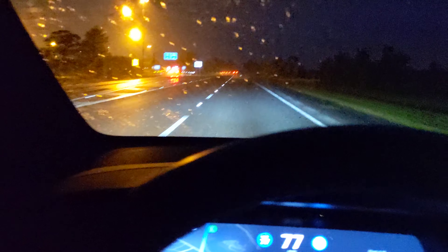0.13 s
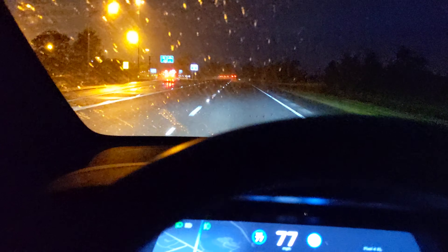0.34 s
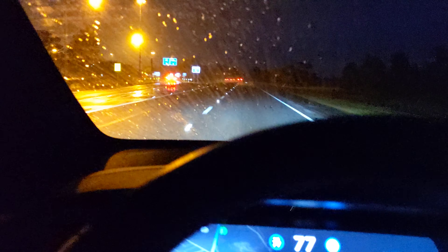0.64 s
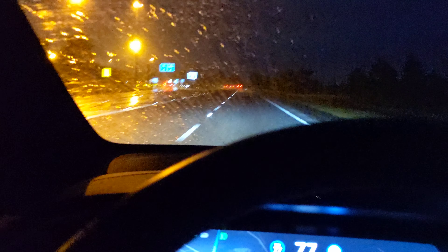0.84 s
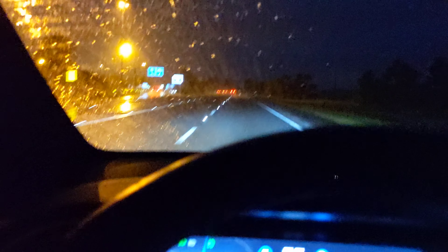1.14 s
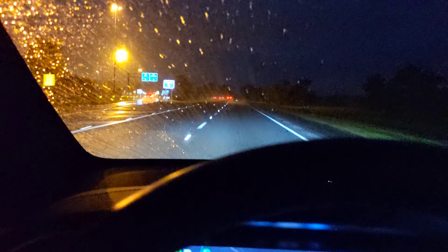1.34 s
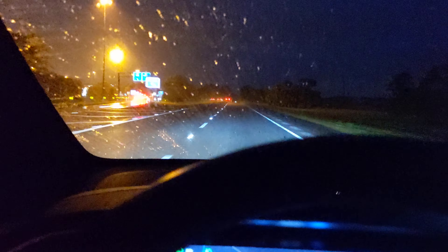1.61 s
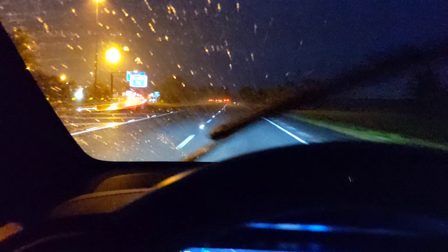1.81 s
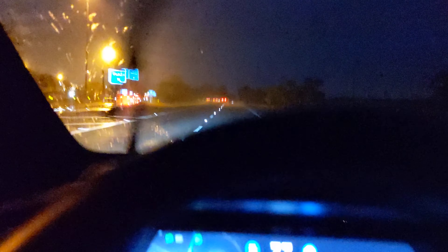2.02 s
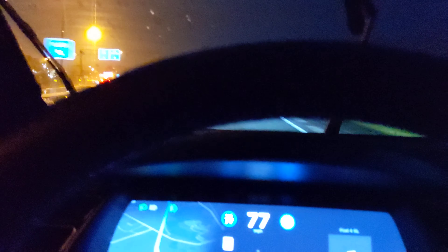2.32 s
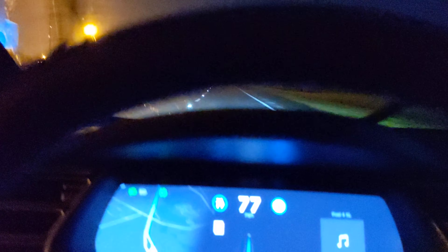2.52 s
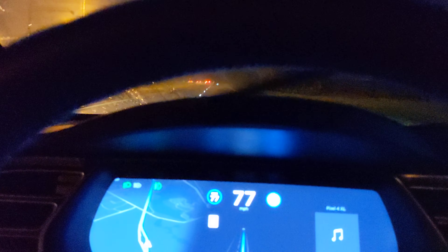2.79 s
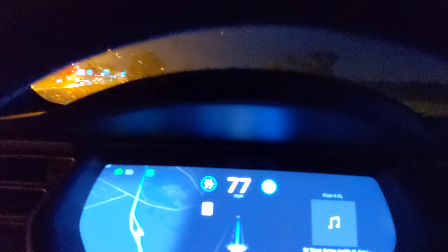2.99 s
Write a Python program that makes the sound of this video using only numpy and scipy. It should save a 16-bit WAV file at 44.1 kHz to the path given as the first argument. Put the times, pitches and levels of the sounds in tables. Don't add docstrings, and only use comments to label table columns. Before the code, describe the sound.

Steady boomy road rumble fills a closed car cabin after a quick fade-in, with quiet fluttering wet hiss and sparse bright drop ticks, more frequent in the last second; close handheld stereo phone microphone.

```python
import sys
import numpy as np
from scipy import signal
from scipy.fft import rfft, irfft, next_fast_len
from scipy.io import wavfile
from scipy.ndimage import uniform_filter1d, map_coordinates

SR = 44100
rng = np.random.default_rng(int(sys.argv[2]) if len(sys.argv) > 2 else 0)


def volts_from_db(level):
    exponent = np.asarray(level, float) / 20
    return 10 ** exponent


def master_out(mix):
    frames = np.transpose(np.atleast_2d(mix))
    ceiling = np.clip(frames, -1, 1)
    pcm = np.round(ceiling * 32767).astype(np.int16)
    wavfile.write(sys.argv[1], SR, pcm)


N = 138915


def unit(x):
    return x / np.sqrt(np.mean(x ** 2) + 1e-20)


def along(points, hz, column=1):
    table = np.transpose(points)
    return np.interp(np.log(hz + 1), np.log(table[0] + 1), table[column])


def curve(rows, t):
    return np.interp(t, *np.transpose(rows))


def wobble(rate):
    knots = rng.standard_normal(int(N * rate / SR) + 4)
    return map_coordinates(knots, [np.arange(N) * rate / SR])


def filtered(x, response):
    m = next_fast_len(N + 8192)
    return irfft(rfft(x, m) * response(np.fft.rfftfreq(m, 1 / SR)), m)[..., :N]


def patchy(patchy_db):
    z = signal.stft(rng.standard_normal((2, N)), nperseg=512)[2]
    field = uniform_filter1d(rng.standard_normal(z.shape[1:]), size=6, axis=0)
    field = uniform_filter1d(field, size=10, axis=1)
    return unit(signal.istft(z * volts_from_db(patchy_db * unit(field)), nperseg=512)[1][:, :N])


def rumble():
    # f/Hz, level/dB per Hz
    body = [(20, -25.5), (45, -1), (110, -10.5), (190, -20.5), (400, -23.5), (480, -32.5), (1400, -35),
            (2000, -51.5)]
    # f/Hz, width/Hz, level/dB per Hz, left over right/dB
    cabin = [(87.4, 15.5, -1.5, 11.5), (128.9, 17.9, -2, 9), (149, 28, -14, 1), (317.7, 14.1, -14.5, 6.5),
             (351, 35, -16, 2.5), (405.5, 46, -16, -1.5), (585.7, 28, -25.5, 6), (676, 65, -25.5, 4),
             (721.5, 70, -21.5, 3), (898, 120, -31, 4), (956, 44, -26.5, 1.5), (1214, 54, -31, 9.5),
             (1329, 86, -36, -6), (1773, 19, -37.5, 1)]
    # f/Hz, left over right/dB
    balance = [(30, 1), (100, -1.5), (180, 0.5), (260, -0.5), (500, -4.5), (2000, 0.5)]
    # f/Hz, likeness/-1 to 1
    alike = [(30, 1), (110, 0.92), (170, 0.62), (250, 0.26), (390, 0.74), (780, 0.88), (1250, 0.18),
             (1700, 0)]
    half = np.array([[.5], [-.5]])

    def mid_and_side(hz):
        angle = np.arccos(np.clip(along(alike, hz), -1, 1)) / 2
        return np.array([np.cos(angle), np.sin(angle)])

    def colour(hz):
        power = volts_from_db(2 * (along(body, hz) + half * along(balance, hz))) * (hz < body[-1][0])
        for centre, width, db, side_db in cabin:
            peak = 1 / (1 + (2 * (hz - centre) / width) ** 2) ** 2
            power = power + volts_from_db(2 * (db + half * side_db)) * peak
        return np.sqrt(power)

    mid, side = filtered(patchy(patchy_db=0.05), mid_and_side)
    level_db = -12.5 + 0.2 * wobble(2.81)
    return volts_from_db(level_db) * unit(filtered(np.array([mid + side, mid - side]), colour))


def drops():
    drops_per_s, centre_hz, decay_cycles, spread_db = 900, 8000, 2.5, 2.5
    count = int(drops_per_s * N / SR)
    u, k = rng.random((count, 4)), np.arange(64)
    hz = np.clip(centre_hz * np.exp(1.39 * (u[:, 1:2] - .5)), 1500, 15000)
    size = volts_from_db(-spread_db * np.log(u[:, 2:3] + 1 / 20))
    decay = np.exp(-k * hz / SR / decay_cycles * 2)
    grains = size * np.sin(2 * np.pi * hz * k / SR) * decay
    room = N + len(k)
    at = (u[:, :1] * N).astype(int) + k + (u[:, 3:] > .5) * room
    return unit(np.bincount(at.ravel(), grains.ravel(), 2 * room).reshape(2, -1)[:, :N])


def spray():
    # f/Hz, level/dB per Hz
    hiss = [(1200, -7), (1700, -3.5), (2500, 0.5), (3500, -7.5), (5000, -11), (8500, -14), (12500, -13),
            (15800, -21.5)]
    # t/s, level/dB
    wetness = [(0.2, 1), (.45, 2), (.7, 0), (.95, 3), (1.3, 0.5), (1.7, 1.5), (2.0, 2), (2.3, 1),
               (2.6, -0.5), (2.9, -0.5), (3.15, 1)]
    # t/s, peak level over the spray/dB, length/s
    splashes = [(0.478, 2, .02), (0.581, 3.5, 0.016), (0.597, 5, 0.063), (0.887, 3, 0.032),
                (.98, 2.5, 0.022), (1.105, 3.5, 0.014), (1.15, 2, 0.033), (1.357, 4, .02), (1.506, 2, .04),
                (1.66, 2.5, .02), (1.68, 2.5, 0.03), (1.711, 3.5, 0.029), (1.792, -3, .01),
                (1.949, 3, 0.031), (1.983, 2, .04), (2.055, 3.5, 0.016), (2.082, -1.5, .02),
                (2.173, 3, 0.016), (2.231, 3.5, 0.034), (2.283, 4.5, .025), (2.351, 4, 0.018),
                (2.385, 4.5, 0.023), (2.42, 4, 0.0085), (2.478, 3, .015), (2.525, 4.5, 0.058),
                (2.629, 4, 0.036), (2.768, -0.5, 0.017), (2.786, 3, 0.039), (2.92, 4, 0.012),
                (2.969, 1, .012), (3.014, 3.5, .012)]
    rise_s, split_hz, dull_swing, bright_swing = 0.001, 3800, 0.59, 1.14
    t = np.arange(N) / SR
    swell_db = 0.29 * wobble(25.11) + 0.81 * wobble(70)
    for s, db, length in splashes:
        rise = (t - s) / rise_s + 1
        fall = 2 - 2 * (t - s) / (1.14 * length)
        swell_db = swell_db + db * np.clip(np.minimum(rise, fall), 0, 1)
    water = patchy(patchy_db=1.16) + volts_from_db(-11) * drops()
    water = filtered(water, lambda hz: volts_from_db(along(hiss, hz)) * (hz > 900))
    dull = filtered(water, lambda hz: 1 / (1 + (hz / split_hz) ** 4))
    swung = volts_from_db(dull_swing * swell_db) * dull + volts_from_db(bright_swing * swell_db) * (water - dull)
    return volts_from_db(-41 + curve(wetness, t)) * unit(swung)


def ports(x):
    # f/Hz, width/Hz, level/dB
    open_port = [(7100, 230, 5.5), (9640, 1200, 3.5), (10600, 600, -4), (11600, 1300, 1.5)]
    # f/Hz, loosely cupped level/dB, change when tightly cupped/dB
    hollow = [(1700, -0.5, 3), (2270, -2.5, 8.5), (2975, 7, 8.5), (3520, 8, 8), (3790, 16.5, 0.5),
              (4860, 10.5, -3.5), (5560, 12.5, -3), (15800, 10, -10.5)]
    # f/Hz, level/dB
    gap = [(5500, 0), (7200, -6), (8300, -18), (10300, -21), (12000, -13.5), (14500, -8), (17000, -7),
           (21000, -19)]
    # t/s, tightness/0-1
    tightness = [(.2, 0.04), (.42, 0), (.55, 0.78), (.75, 1), (.92, .8), (1.05, .45), (1.5, 0.33),
                 (2.0, 0.28), (2.35, 0.31), (2.6, 0.73), (2.9, 0.67), (3.1, 0.2)]

    def left_colour(hz):
        return volts_from_db(sum(db * np.exp(-(2 * (hz - c) / w) ** 2) for c, w, db in open_port))

    left = filtered(x[0], left_colour)
    hz, t, z = signal.stft(x[1], SR, nperseg=256)
    grip = curve(tightness, t)
    hollow_db = along(hollow, hz)[:, None] + np.outer(along(hollow, hz, column=2), grip)
    gap_db = along(gap, np.outer(hz, 1 + 0.45 * grip))
    right = signal.istft(z * volts_from_db(hollow_db + gap_db), SR, nperseg=256)[1][:N]
    return np.array([left, right])


def ticks():
    # t/s, peak level/dB
    hits = [(.575, -38), (1.125, -38), (1.363, -36), (1.68, -35), (1.795, -37), (1.984, -37), (2.298, -36),
            (2.39, -35), (2.421, -38), (2.476, -38), (2.527, -37), (2.633, -36), (2.766, -32), (2.925, -36),
            (2.969, -34), (3.014, -35), (3.019, -34)]
    t60_s, low_hz, top_hz = .016, 5500, 13000
    out, t = np.zeros((2, N + SR)), np.arange(SR // 50) / SR
    for s, db in hits:
        burst = volts_from_db(db - 60 * t / t60_s) * rng.standard_normal((2, len(t)))
        out[:, round(s * SR):][:, :len(t)] += burst

    def bright(hz):
        high_pass = 1j * hz / (low_hz + 1j * hz)
        return high_pass ** 2 / (1 + (hz / top_hz) ** 6)

    return filtered(out[:, :N], bright)


def ride(x, seconds, share):
    memory = np.exp(-np.arange(int(4 * seconds * SR)) / (seconds * SR))
    power = np.abs(signal.fftconvolve(np.mean(x ** 2, axis=0), memory / memory.sum())[:N])
    return (power / power.mean() + 0.027) ** (-np.clip(share, 0, 1) / 2)


def scene():
    boom_hz, full_s, rise_db_per_s = 180, .23, 250
    road = rumble()
    boom = filtered(road, lambda hz: 1 / (1 + (hz / boom_hz) ** 6))
    late = volts_from_db(np.minimum(rise_db_per_s * (np.arange(N) / SR - full_s), 0))
    settled = boom * late * ride(boom, seconds=0.013, share=.3)
    return road - boom + settled + ports(spray() + ticks())


def band_limit(x):
    return signal.sosfilt(signal.butter(12, 15720, fs=SR, output="sos"), x)


def record(dry):
    fade_start_s, fade_s, fade_power = .13, 0.097, 4.17
    ceiling, knee, most_gain_db = 1.4, 3, 3
    fade = np.clip((np.arange(N) / SR - fade_start_s) / fade_s, 0, 1) ** fade_power
    even = dry * np.minimum(ride(dry, seconds=0.086, share=0.26), volts_from_db(most_gain_db))
    mix = fade * even / (1 + np.abs(even / ceiling) ** knee) ** (1 / knee)
    return band_limit(mix)


dry = scene()
out = record(dry)
master_out(out)
```